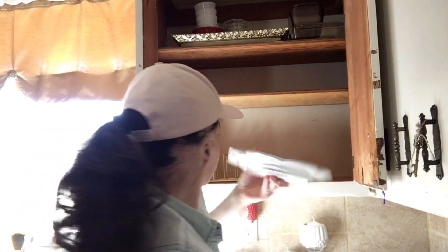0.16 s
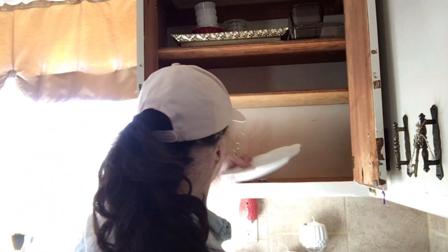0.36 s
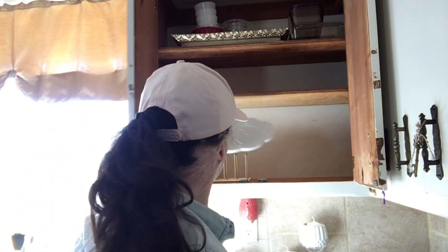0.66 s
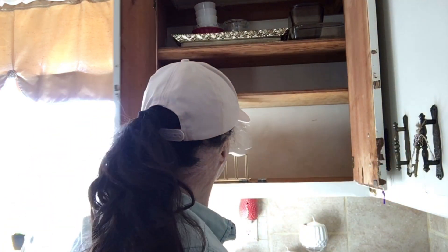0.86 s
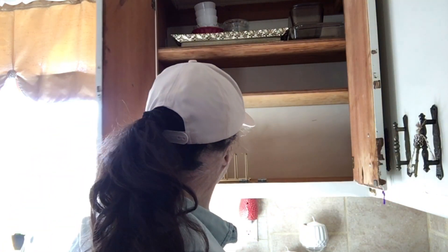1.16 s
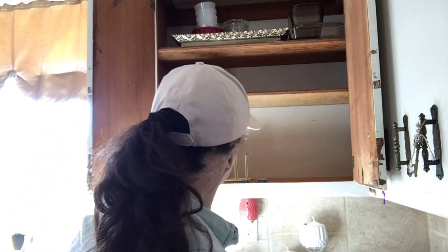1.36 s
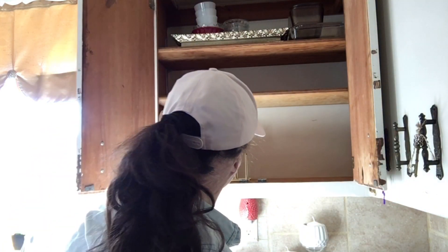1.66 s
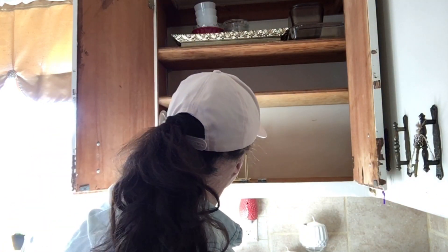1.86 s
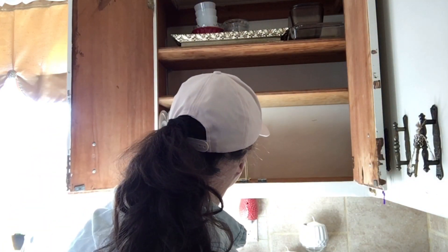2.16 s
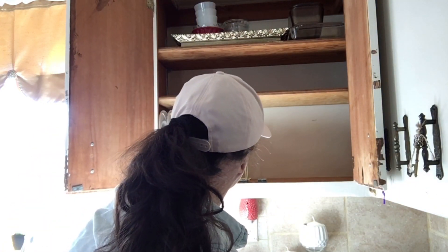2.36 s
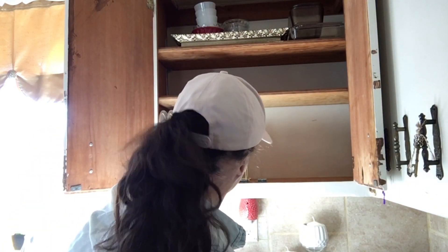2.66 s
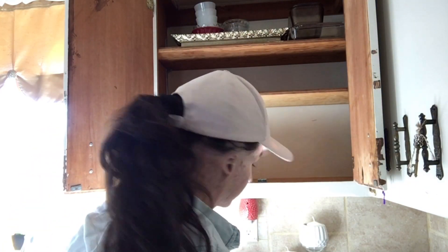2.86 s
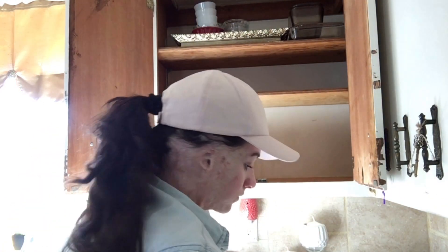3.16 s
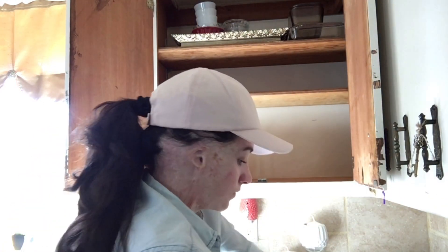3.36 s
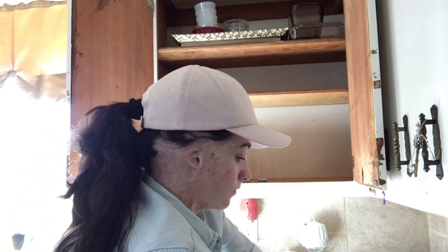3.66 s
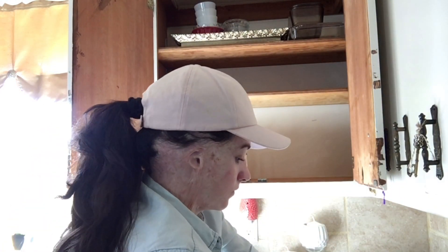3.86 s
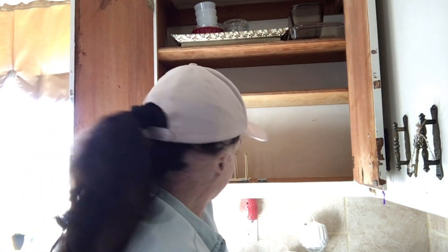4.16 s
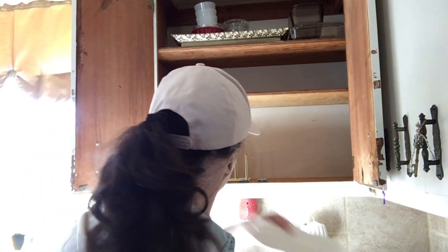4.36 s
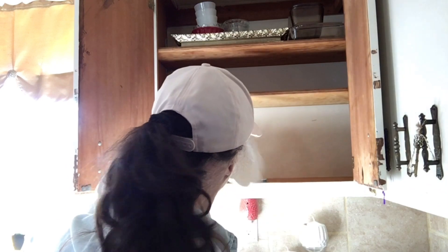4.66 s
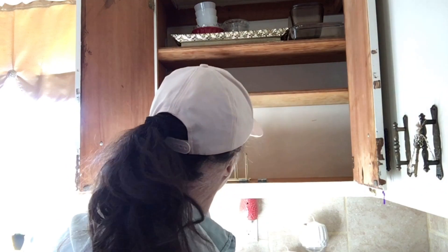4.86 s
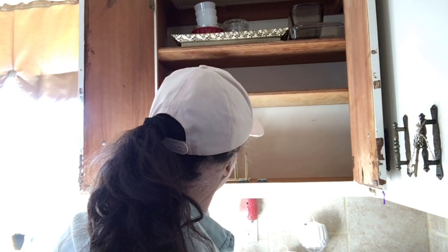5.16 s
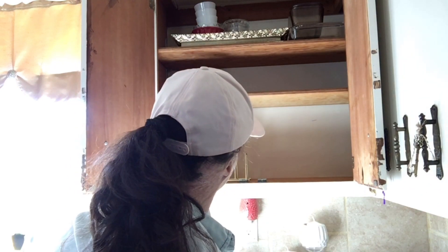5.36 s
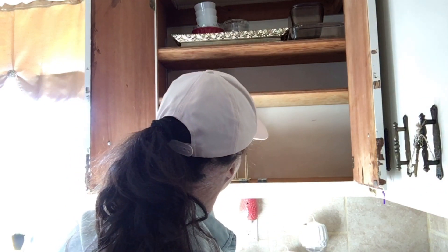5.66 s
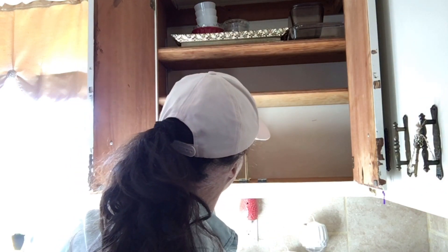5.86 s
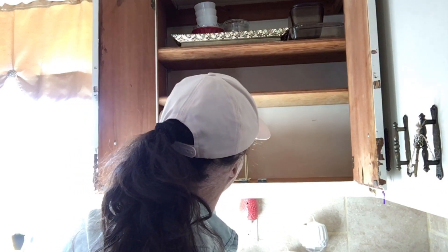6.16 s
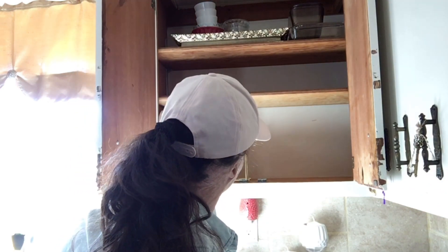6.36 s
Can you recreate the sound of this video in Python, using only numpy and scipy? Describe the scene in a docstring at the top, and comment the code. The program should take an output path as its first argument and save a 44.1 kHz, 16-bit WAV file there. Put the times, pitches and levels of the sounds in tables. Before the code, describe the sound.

A low hum and soft air hiss fill a small, quiet kitchen throughout, with a few barely audible dry ticks. At about 1.4 seconds, a ceramic plate goes into a rack on a wooden cabinet shelf, clinking brightly against its neighbours, with a firm wooden knock near 1.9 seconds and lighter touches after. From 2.4 to about 2.8 seconds it rocks to rest in quickening taps that swell, then fade and dull. Between 3.5 and 4 seconds, plates clatter and knock the counter as one is lifted off a stack, loudest near 3.7 seconds. After a pause, another plate clinks into the rack from 5.4 seconds, with a solid knock on the shelf near 5.9, a few faint touches and a last clink at about 6.4 seconds. Every contact sounds fairly close and rings briefly, with a short, hard room echo.

```python
"""Ceramic plates are stood in a rack on a wooden cabinet shelf and lifted off a stack, in a quiet kitchen.
Each contact is a short chatter that rings the plate and knocks the wood; one plate rocks to rest.
A small hard room answers; a low hum, room air and a faint tick lie underneath."""
import sys
import numpy as np
from scipy import signal
from scipy.fft import rfft, irfft, next_fast_len
from scipy.io import wavfile
from scipy.ndimage import uniform_filter1d

SR = 44100
rng = np.random.default_rng(int(sys.argv[2]) if len(sys.argv) > 2 else 0)


def materialize(psi):
    """Save the field psi as 16-bit PCM at rate SR to the path in sys.argv[1].

    A 1-D psi becomes a single channel; in a 2-D psi each row is a channel.
    """
    bounded = np.clip(np.atleast_2d(psi).T, -1, 1)
    quanta = np.round(bounded * 32767).astype(np.int16)
    wavfile.write(sys.argv[1], SR, quanta)


N = 286209

# Wooden shelf modes. Each row: frequency in Hz, width in Hz, relative level in dB.
SHELF_MODES = [(187.8, 36, -1), (230.7, 21.7, 1.5), (344, 26, -9.5), (445, 83, -4), (544.5, 28.5, -1.5),
               (676, 280, -7.5), (814, 300, -5.5), (1135, 180, -7.5)]


def amp(db):
    """dB to gain."""
    return 10 ** (np.asarray(db) / 20)


def along(points, hz):
    """Interpolate (Hz, value) points on a log axis."""
    f, v = np.transpose(points)
    return np.interp(np.log(hz + 1), np.log(f + 1), v)


def filtered(x, response):
    """Filter x by response(hz)."""
    m = next_fast_len(x.shape[-1] + 4096)
    return irfft(rfft(x, m) * response(np.fft.rfftfreq(m, 1 / SR)), m)[..., :x.shape[-1]]


def to_peak(x, db):
    """Scale x so its loudest 4 ms has an RMS of db."""
    return amp(db) * x / np.sqrt(np.max(uniform_filter1d(x ** 2, size=176)))


def air(rms_db=-43, patch_db=0.97):
    """Hum and hiss of the room, in slightly uneven patches."""
    # Each row: frequency in Hz, relative density in dB.
    spectrum = [(13, -44), (22, -0.5), (59, 5), (80, -6), (179, -11), (205, -12), (409, -15), (444, -20.5),
                (482, -16), (730, -27), (2140, -35), (16000, -64.5)]
    z = signal.stft(rng.standard_normal(N + 512), nperseg=1024)[2]
    patches = uniform_filter1d(rng.standard_normal(z.shape), size=8, axis=0)
    patches = uniform_filter1d(patches, size=8, axis=1)
    noise = signal.istft(z * amp(patch_db * patches / patches.std()), nperseg=1024)[1][:N]
    noise = filtered(noise, lambda hz: amp(along(spectrum, hz)))
    return amp(rms_db) * noise / noise.std()


def ticks(centre_hz=7000, width_hz=9000, top_hz=12500):
    """Faint dry ticks about 1.3 s apart: band-passed impulses."""
    # Each row: start in seconds, relative level in dB.
    events = [(0.7342, -42), (2.0348, -26.5), (3.3578, -40.5), (4.6827, -54), (6.0049, -37)]
    impulses = np.zeros(N)
    for start_s, db in events:
        impulses[round(start_s * SR)] = amp(db + 8)
    band = lambda hz: 1j * hz * width_hz / (centre_hz ** 2 - hz * hz + 1j * hz * width_hz)
    return filtered(impulses, lambda hz: band(hz) ** 2 / (1 + (hz / top_hz) ** 10))


def rack():
    """Plates stood in the rack ring with their neighbours and knock the shelf."""
    # Rows as in contacts() and ringing().
    touches = [(1.3786, -40, -15, -42, 2540), (1.3902, -27.5, -13.5, -41, 3700),
               (1.4569, -21.5, -10.5, -32, 2320), (1.501, -27, -11, -34, 3200),
               (1.6368, -39.5, -8, -36, 2160), (1.6974, -39.5, -11, -36.5, 2160),
               (1.7605, -39.5, -12.5, -39, 3650), (1.8528, -41.5, -22, -45.5, 3250),
               (1.8905, -25, -14.5, -13, 1900), (2.0323, -34.5, -22, -48.5, 2250),
               (2.136, -36, -33, -30.5, 2320), (2.1587, -33.5, -29.5, -46.5, 2280),
               (2.2229, -40, -32, -39, 1520), (2.3462, -36.5, 0.5, -40, 3500),
               (2.356, -22.5, -45, -32, 1610), (5.3837, -22, -11.5, -32.5, 2600),
               (5.4163, -22.5, -5, -32, 3730), (5.4703, -29, -4, -48, 3670), (5.5455, -27, -7.5, -38, 2220),
               (5.6585, -38.5, -9, -40, 2420), (5.7261, -41.5, -15, -37.5, 1700),
               (5.8094, -41.5, -18.5, -37, 3650), (5.8579, -31.5, -16, -10.5, 1550),
               (6.1388, -54, -23, -50, 2250), (6.166, -72.5, -12.5, -22.5, 2340),
               (6.332, -48.5, -27, -38.5, 1550), (6.3844, -47, -28, -39.5, 2350),
               (6.4318, -23, -17.5, -27, 2360)]
    plate_modes = [(1335, 25, -12), (1520, 50, -6), (1880, 45, -8), (2160, 35, -3), (2245, 28, -1),
                   (2330, 35, -3), (3250, 45, -8), (3680, 50, -3), (4850, 55, -18), (5250, 45, -14),
                   (5700, 55, -15), (7000, 70, -15), (7900, 30, -24), (8530, 45, -24), (9670, 14, -25),
                   (10700, 35, -30), (12040, 24, -35), (14300, 200, -42)]
    return contacts(touches, plate_modes, SHELF_MODES, thud_top_hz=300, neighbour_db=0, spread=0.0235,
                    chatter_t60_s=0.032, knock_trim_db=-1, rattle_trim_db=3)


def ringing(modes, t, detune=1):
    """One dying sine per mode. Each row: frequency in Hz, width in Hz, relative level in dB."""
    hz, width_hz, db = np.transpose(modes)[:, :, None]
    width_hz = np.abs(width_hz)
    envelope = np.exp(-np.pi * width_hz * t) * (1 - np.exp(-t / 0.0015))
    return amp(db) * width_hz * np.sin(2 * np.pi * hz * detune * t) * envelope


def contacts(touches, plate, wood, thud_top_hz, neighbour_db, spread, chatter_t60_s,
             knock_trim_db, rattle_trim_db, treble_hz=4500, scatter_db=4.5):
    """Each touch chatters, rattles and rings plate, neighbours and wood; the room answers.
    Each row: start in seconds, ring in dB, treble in dB re ring, thud in dB, favoured mode in Hz."""
    # Unpitched rattle. Each row: frequency in Hz, relative density in dB.
    rattle_spectrum = [(250, -47), (500, -7.5), (1840, -3.5), (2800, -7.5), (3700, -9), (4500, -15.5),
                       (7000, -13.5), (12500, -38.5), (16000, -75)]
    out, t = np.zeros(N + SR), np.arange(SR // 3) / SR
    plates = [ringing(plate, t)]
    for side in (-1, 1):  # neighbours are alike but not equal
        detune = 1 + side * spread * rng.uniform(.5, 2.1, (len(plate), 1))
        plates.append(amp(neighbour_db) * ringing(plate, t, detune))
    modes = np.vstack([*plates, ringing(wood, t)])
    mode_hz = np.array(list(plate) * len(plates) + list(wood))[:, 0]
    ceramic = np.arange(len(modes)) < len(modes) - len(wood)
    upper = mode_hz > np.where(ceramic, treble_hz, thud_top_hz)
    # thud, knock, ring, treble ring
    groups = np.array([~ceramic & ~upper, ~ceramic & upper, ceramic & ~upper, ceramic & upper])
    near_mode = lambda hz: np.exp(-(np.log((hz + 1) / mode_hz[:, None]) / .02) ** 2).max(axis=0)
    bands = lambda hz: np.where(hz < treble_hz, .35, .16) + near_mode(hz)
    gaps_s = np.diff(np.array(touches)[:, 0], append=N / SR)
    fall = amp(-60 * t / chatter_t60_s) * (1 - np.exp(-t / 0.003))
    low_cut = signal.butter(4, 160, "high", fs=SR, output="sos")  # small things radiate no deep bass
    for (start_s, ring_db, treble_db, thud_db, favoured_hz), gap_s in zip(touches, gaps_s):
        chatter = (fall * rng.standard_normal(len(t)) ** 3)[:SR // 10]  # spiky micro-bounces
        chatter[40] += .6 * np.linalg.norm(chatter)  # the leading blow
        push = chatter * fall[:len(chatter)] ** 2  # heavy wood feels mostly the first blow

        strength = amp(scatter_db * np.where(ceramic, 1, .5) * rng.standard_normal(len(modes)))
        strength *= rng.choice([-1, 1], len(modes))
        strength *= amp(12 * np.exp(-(np.log(mode_hz / favoured_hz) / 0.09) ** 2))  # struck spot
        responses = (strength * groups) @ modes
        parts = signal.fftconvolve(responses, [push, push, chatter, chatter], axes=1)[:, :len(t)]
        thud_excess_db = thud_db - ring_db
        knock_db = ring_db + 0.89 * thud_excess_db + knock_trim_db
        knock_db -= 0.55 * np.clip(treble_db + 15.5, -10, 10)  # duller contacts knock harder
        levels_db = thud_db, knock_db, ring_db, ring_db + treble_db
        hit = sum(to_peak(part, db) for part, db in zip(parts, levels_db))

        burst = rng.standard_normal(len(t)) * amp(-60 * t / 0.1) * (1 - np.exp(-t / 0.002))
        shine_db = lambda hz: along([(3500, 0), (5000, treble_db + 7.5)], hz)
        rattle = filtered(burst, lambda hz: amp(along(rattle_spectrum, hz) + shine_db(hz)) * bands(hz))
        hit += to_peak(rattle, ring_db + 0.38 * thud_excess_db + rattle_trim_db)

        # Damped by the next touch or by coming to rest, sooner after a heavy landing.
        rest_s = .09 * amp(-0.74 * max(thud_excess_db, 0))
        hit *= amp(-300 * np.maximum(t - min(gap_s, rest_s), 0))
        hit = signal.sosfilt(low_cut, hit)
        out[round(start_s * SR):][:len(t)] += hit + amp(-5.5) * kitchen(hit)
    return out[:N]


def kitchen(x):
    """Room reverberation; the treble dies soonest."""
    # Each row: frequency in Hz, T60 in seconds.
    decay = [(150, 0.31), (1000, 0.33), (4000, 0.33), (12000, 0.24)]
    hz, t, z = signal.stft(rng.standard_normal(SR // 3), SR, nperseg=256)
    tail = signal.istft(z * amp(-60 * t / along(decay, hz)[:, None]), SR, nperseg=256)[1]
    return signal.fftconvolve(np.pad(x, (250, 0)), tail / np.linalg.norm(tail))[:len(x)]


def rocking_plate(start_s=2.4223, first_gap_s=.0605, gap_ratio=.917, favoured_hz=3450):
    """A plate rocks to rest on alternate edges: quickening taps swell, then fade and dull."""
    # Rows as in ringing().
    plate_modes = [(960, 22, -10), (1525, 40, -8), (1730, 70, -1), (2330, 25, -12), (3450, 27, 0),
                   (5243, 50, -16), (5650, 70, -17), (7070, 40, -10), (7480, 37, -22), (8900, 50, -29),
                   (9840, 50, -31), (10600, 50, -32), (11700, 44, -37), (12450, 40, -36)]
    tap = np.arange(9)
    tap_s = start_s + first_gap_s * (1 - gap_ratio ** tap) / (1 - gap_ratio)
    ring_db = -31 - .5 * (tap - 2.24) ** 2
    treble_db = -8.5 - 3 * tap + 5 * (-1) ** tap  # one edge is brighter
    thud_db = ring_db - 26.5
    touches = np.transpose([tap_s, ring_db, treble_db, thud_db, np.full(len(tap), favoured_hz)])
    return contacts(touches, plate_modes, SHELF_MODES, thud_top_hz=300, neighbour_db=-18, spread=0.018,
                    chatter_t60_s=0.022, knock_trim_db=-6, rattle_trim_db=-1.5)


def stack():
    """Plates lifted off a stack clatter together and knock the counter."""
    # Touch rows as in contacts(), mode rows as in ringing().
    touches = [(3.4705, -29, -21, -19, 1400), (3.5092, -62, -32, -25, 1400),
               (3.5494, -26.5, -19.5, -20.5, 3320), (3.6409, -34.5, -14.5, -26.5, 2230),
               (3.6597, -41.5, -4, -28, 2260), (3.6873, -16.5, -12, -18, 2700),
               (3.7089, -25.5, -9, -19, 2330), (3.7629, -30, -12.5, -27.5, 2600),
               (3.8083, -60, 7, -37.5, 2160), (3.8792, -56, -13, -37, 2330),
               (3.914, -48.5, -19, -37.5, 2280), (3.9824, -72, -8, -33.5, 2300)]
    plate_modes = [(1807, 70, 2.5), (2236, 11, 8.5), (2270, 22, -7), (2485, 84, 3.5), (2720, 130, 1.5),
                   (3376, 77, 0.5), (3713, 78, 12), (4100, 45, -26), (5270, 79, -3), (5810, 155, -1.5),
                   (7140, 41, -17), (8740, 60, -56.5), (9700, 50, -44), (10050, 110, -15.5),
                   (12500, 66, -50)]
    counter_modes = [(213, 83, -3.5), (415.3, 37, 2.5), (770, 240, 2), (1010, 300, 0.5), (1337, 200, 1.5)]
    return contacts(touches, plate_modes, counter_modes, thud_top_hz=600, neighbour_db=-10, spread=.025,
                    chatter_t60_s=0.025, knock_trim_db=0.5, rattle_trim_db=-2.5)


def scene():
    """Mono sum of all sources."""
    return (rack() + rocking_plate() + stack() + ticks() + air())[None]


def record(dry):
    """Brick-wall low-pass."""
    top_hz = 15800
    padded = np.pad(dry, ((0, 0), (0, 999)), "reflect")
    return filtered(padded, lambda hz: hz < top_hz)[:, :N]


dry = scene()
out = record(dry)
materialize(out)
```